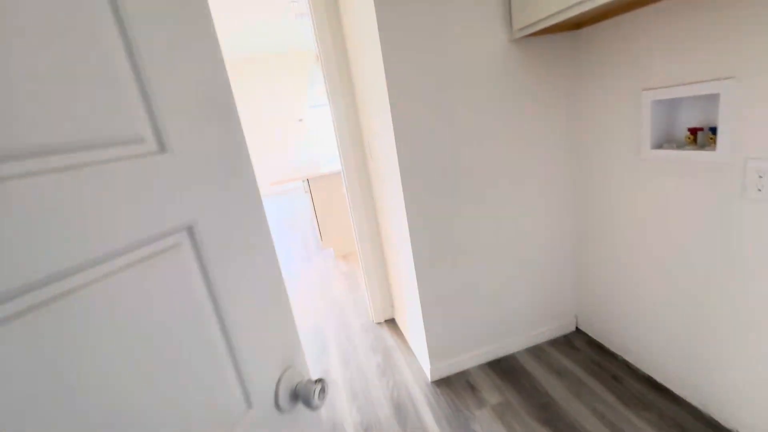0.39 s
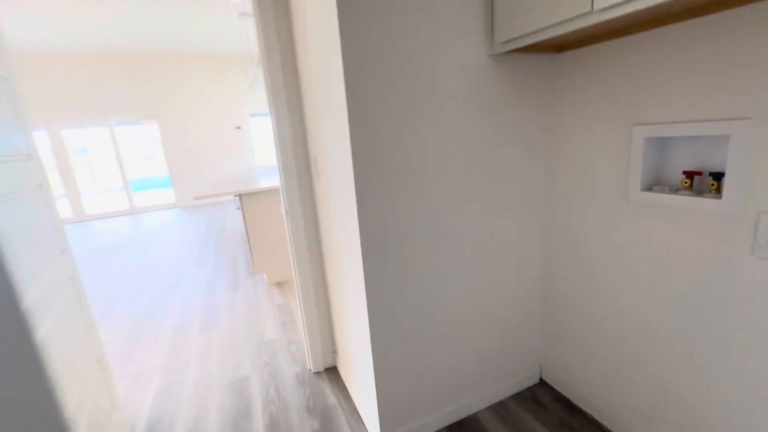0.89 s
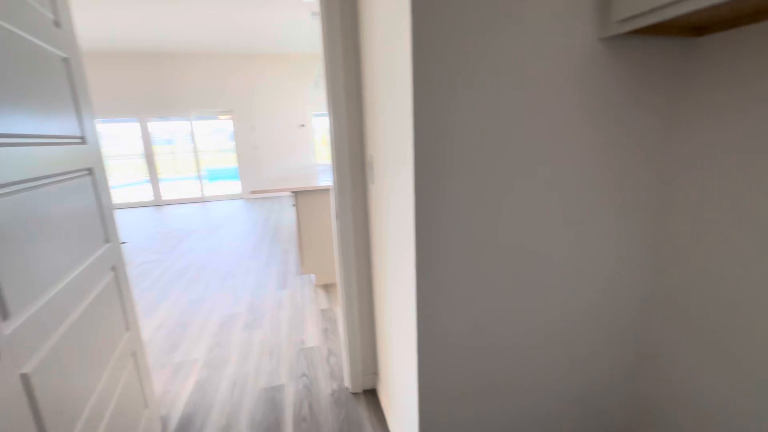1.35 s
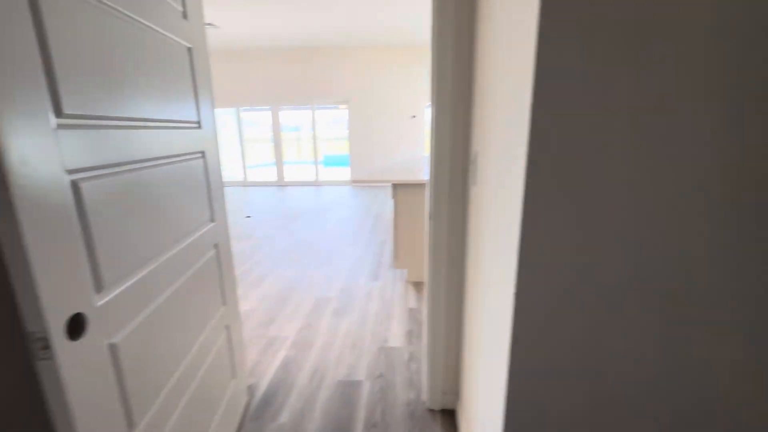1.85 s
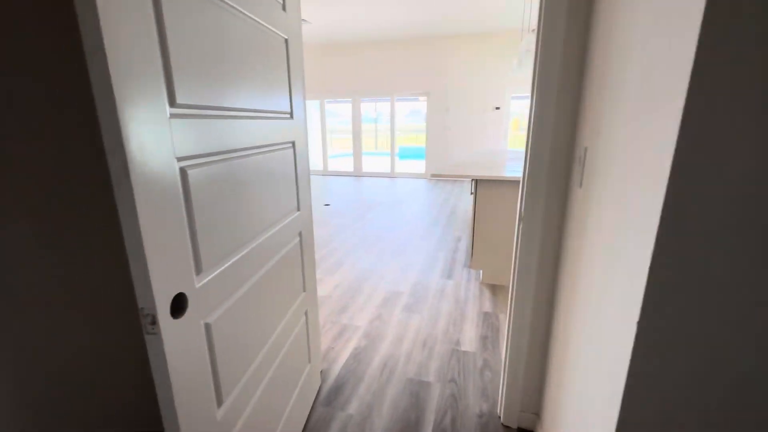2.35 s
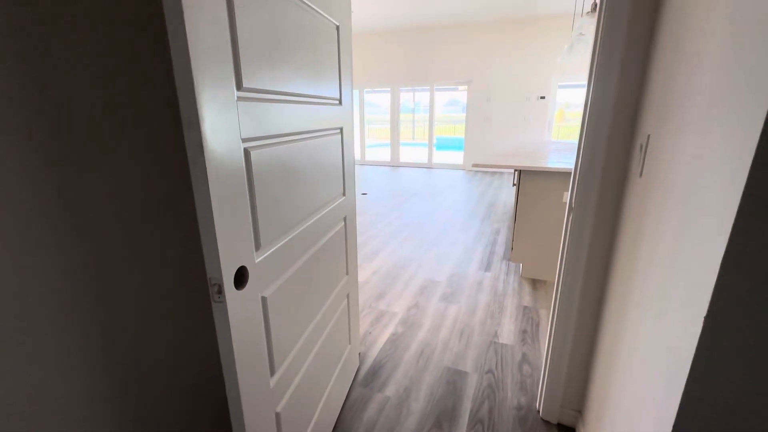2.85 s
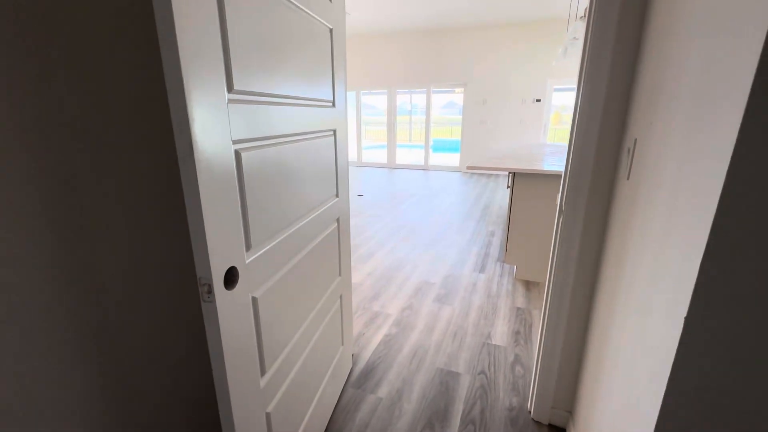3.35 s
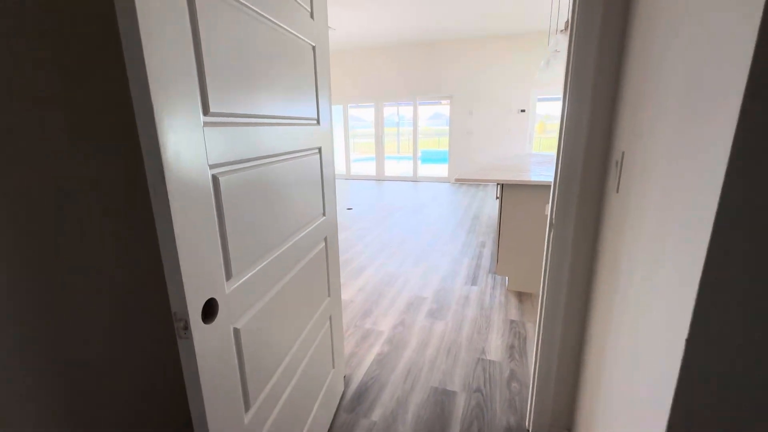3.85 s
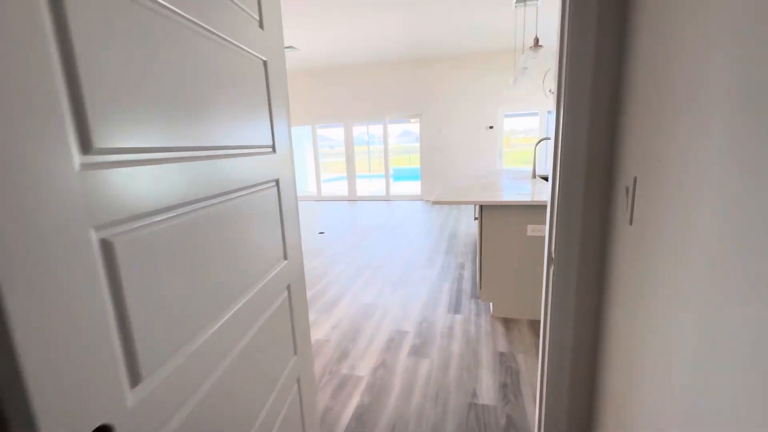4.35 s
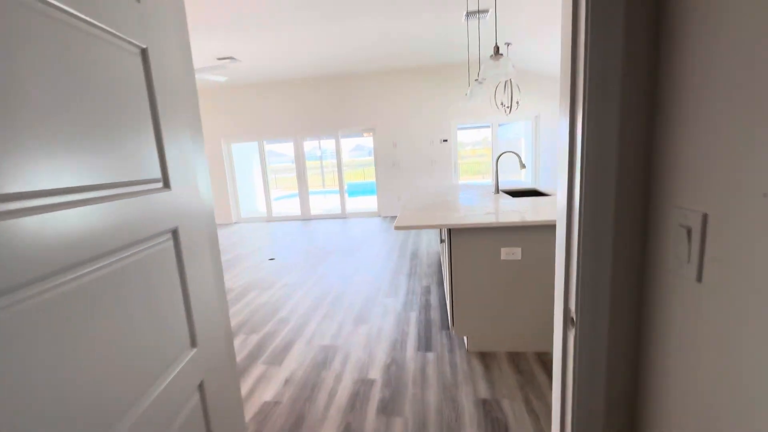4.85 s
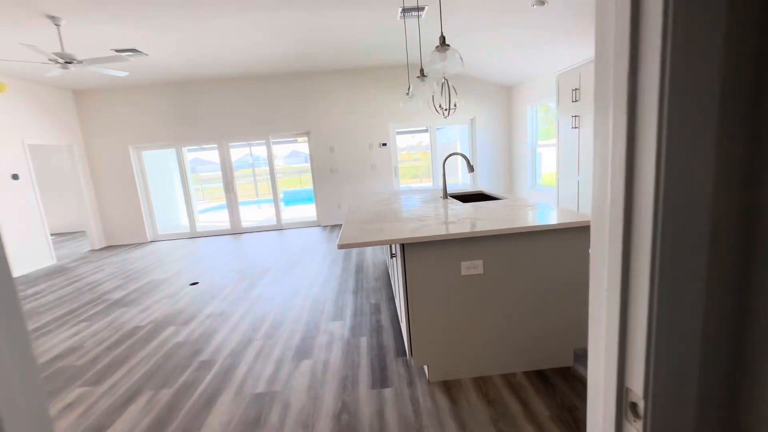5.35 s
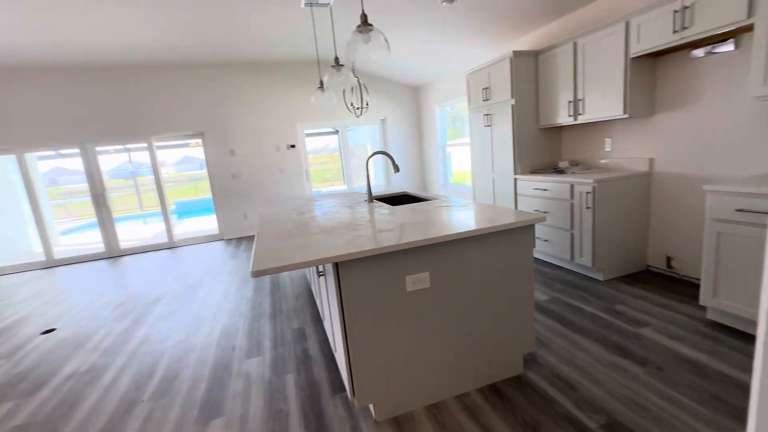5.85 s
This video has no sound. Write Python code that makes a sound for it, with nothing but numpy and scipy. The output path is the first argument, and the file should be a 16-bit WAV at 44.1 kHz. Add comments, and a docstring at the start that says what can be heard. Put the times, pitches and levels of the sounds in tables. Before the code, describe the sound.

Inside an empty, hard-floored house with a faint motor hum and low rumble, a soft low roll fades while small ticks, rustles and light shoe slaps sound. A hinge squeaks faintly, a sole scrapes sharply, then a door knocks twice and thuds heavily, shuddering briefly. A long echo fades as scuffing steps resume. Stereo microphones are carried close, most details leaning left.

```python
"""A faint appliance hum, a rumble and constant noise last throughout; a low roll opens, made of filtered noise.
Soles slap (squeezed air), scuff and rustle (shaped noise), small things tick (short rings), a hinge squeaks
(narrow gliding noise) and a sole scrapes. A door is then knocked twice, thuds (low resonances) and shudders on.
Walking resumes. Bare rooms answer with a long echo of fading noise.
Two spaced microphones hear it; the left one is nearer to most sounds."""
import sys
import numpy as np
from scipy import signal
from scipy.fft import rfft, irfft, next_fast_len
from scipy.io import wavfile
from scipy.ndimage import uniform_filter1d, map_coordinates

SR = 44100
rng = np.random.default_rng(int(sys.argv[2]) if len(sys.argv) > 2 else 0)


def materialize(psi):
    """Save the field psi as 16-bit PCM at rate SR to the path in sys.argv[1].

    A 1-D psi becomes a single channel; in a 2-D psi each row is a channel.
    """
    bounded = np.clip(np.atleast_2d(psi).T, -1, 1)
    quanta = np.round(bounded * 32767).astype(np.int16)
    wavfile.write(sys.argv[1], SR, quanta)


def decibels_to_gain(level_db):
    """Convert a level in decibels to a linear amplitude gain (20 dB per decade)."""
    exponent = np.asarray(level_db, float) / 20
    return 10 ** exponent


N = 273861  # length [samples]

# Rumble of the building over time: (time [s], level [dB])
RUMBLE_LEVEL = [(0.0, -55.5), (1.3, -57.5), (1.9, -54), (2.46, -62), (2.85, -55.5), (3.2, -61), (5.0, -63),
                (6.21, -63.5)]
# Colour of that rumble: (frequency [Hz], relative level per hertz [dB])
RUMBLE_COLOUR = [(15, -43), (30, -1), (45, -4), (70, 4.5), (105, -7.5), (150, -11), (240, -5.5),
                 (350, -8.5), (570, -91)]
# Colour of the faint constant noise: (frequency [Hz], relative level per hertz [dB])
NOISE_COLOUR = [(120, -81), (200, -49), (282, 5.5), (338, -16.5), (412, -3.5), (696, -12.5), (929, -9.5),
                (3870, -19), (8260, -36.5), (15000, -64)]
# Motor over time: (time [s], turns per second [Hz], change of wavering tones [dB], change of steady tone [dB])
MOTOR = [(0, 70.05, 5, -2.5), (.5, 71.26, -1, -1.5), (1.5, 71.05, -4, -2), (3.3, 70.57, -12, 0),
         (5, 71.74, -7, -10), (6.21, 70.6, -8.5, -3)]
# Wavering motor tones: (multiple of the motor's frequency [-], level before that change [dB])
WAVERING_TONES = [(1, -76), (2, -65.5), (3, -93), (5, -75)]
# Steady motor tone: (multiple of the motor's frequency [-], level before that change [dB])
STEADY_TONE = (4, -61)
# Colour of the opening roll: (frequency [Hz], relative level per hertz [dB])
ROLL_COLOUR = [(40, -37), (70, 5), (100, -3), (150, 1.5), (200, -9.5), (280, -43)]
# Noise under the separate events: sole drag, at 4.2 s mostly the door's dying echo; rustle of cloth and grit
# (time [s], drag or echo [dB], rustle [dB])
MOVING = [(0.0, -55.5, -55.5), (0.4, -55, -60.5), (0.8, -55.5, -57), (0.98, -54, -65.5), (1.25, -60, -63.5),
          (1.6, -54.5, -59), (2.3, -55, -82), (2.6, -60.5, -81), (2.8, -60, -56.5), (3.0, -58, -85),
          (3.38, -74, -82), (4.2, -49, -59.5), (4.5, -57, -57.5), (4.86, -59.5, -65.5), (5.1, -55, -54),
          (5.27, -85.5, -71.5), (5.5, -50.5, -58), (6.1, -65, -72.5)]
# Colour of dragging soles: (frequency [Hz], relative level per hertz [dB])
DRAG_COLOUR = [(250, -19.5), (450, -6), (800, -2), (1200, 0), (1700, -3), (2600, -16), (4000, -38)]
# Colour of rustle and grit: (frequency [Hz], relative level per hertz [dB])
GRIT_COLOUR = [(1500, -5.5), (2400, -1), (3300, 1.5), (4300, -0.5), (5200, 2), (6000, 1.5), (7200, -3.5),
               (8300, -4), (10000, -9), (16000, -11.5)]
# Bright ticks: (time [s], level [dB], ring [Hz], left over right [dB])
TICKS = [(0.0337, -36.5, 3640, 10), (0.2537, -37.5, 3900, 6.5), (0.293, -43, 5760, 1),
         (0.432, -33, 4050, 7), (0.4442, -28.5, 6800, 11.5), (0.4448, -28, 2060, -2),
         (0.744, -45, 6100, 1.5), (0.8864, -32, 4120, 0.5), (1.197, -37, 4380, 17), (1.4695, -33, 4050, 7),
         (1.7737, -47.5, 8420, -29), (2.8405, -42, 4100, -1), (2.8533, -24, 3600, 6),
         (2.86, -22.5, 3770, -12)]
# Soles landing and sliding: (time [s], drag [dB], grit [dB])
SCUFFS = [(.783, -57.5, -57.5), (0.87, -59.5, -56), (1.199, -63.5, -61.5), (1.396, -53.5, -52.5),
          (2.759, -80, -61), (2.878, -40, -39), (4.089, -57, -57), (4.259, -64, -62), (4.454, -51.5, -49.5),
          (4.574, -66, -53), (4.806, -54, -54.5), (5.024, -51, -46), (5.417, -54.5, -62), (5.664, -50, -51),
          (6.044, -54.5, -54)]
# Blows of the door: (time [s], level [dB], boom over it [dB], edge over it [dB], 60 dB fade of the rattle [s])
BLOWS = [(3.409, -35, -13, 1, 0.21), (3.416, -27, -3, 3.5, 0.05), (3.439, -31.5, 8, -2, 0.34),
         (3.547, -8.5, -8.5, -21, 0.039), (3.551, -13, -12, -25, 0.039), (3.562, -19, 7, -29, 0.045),
         (3.584, -17.5, -4, -37, 0.18)]
# The door shudders on against its stop: (time [s])
REBOUND_TIMES = [3.604, 3.684, 3.719, 3.839, 3.949]
# Low resonances of door and floor: (frequency [Hz], width [Hz], relative level [dB])
DOOR_MODES = [(30.2, 20, -2.5), (48.4, 15, -2), (65, 2.64, 8), (70.9, 27.7, 1), (97, 41, -1),
              (142.5, 26, 1), (229, 34.4, -4), (289.3, 22, -4), (391, 113, -9)]
# Resonances of the rattling panel: (frequency [Hz], width [Hz], relative level [dB])
PANEL_MODES = [(636, 384, 1.5), (1000, 756, 3.5), (1700, 640, 2.5), (2490, 1860, -11.5)]
# Sole slaps: (time [s], level [dB], pitch of the air pocket [Hz], snap over slap [dB], near walls' answer [dB])
STEPS = [(0.53, -31.5, 740, -10, 4.5), (0.606, -36, 710, -0.5, 3.5), (1.453, -43, 1130, 1, 9),
         (1.469, -28, 1100, -5, -2.5), (1.571, -25.5, 1070, 4.5, 4.5), (1.919, -19, 894, -7, 4),
         (2.878, -31, 1000, 5.5, 1.5), (4.799, -35.5, 867, -24, 4.5), (4.875, -32, 1100, 9, 4),
         (5.517, -26.5, 1610, -6, 0), (6.043, -38.5, 716, -27, 2.5), (6.085, -35, 970, -3, 0)]
# Likeness of room sound at both microphones: (frequency [Hz], left-right likeness [-])
LIKENESS = [(25, 0.98), (60, 0.9), (180, 0.78), (450, 0.34), (1000, 0.24), (2400, 0.08), (6000, 0.07),
            (10000, 0.45), (13000, 0.6)]
# Fading of the near walls' answer: (frequency [Hz], time to fall 60 dB [s])
NEAR_FADE = [(60, 0.12), (500, 0.36), (2000, 0.22), (10000, 0.098)]
# Fading of the whole house's answer: (frequency [Hz], time to fall 60 dB [s])
HOUSE_FADE = [(60, 1.3), (170, 0.53), (400, 1.19), (800, 1.73), (1500, 2.25), (4000, 1.41), (10000, 0.99)]
# Colour of the microphones: (frequency [Hz], gain [dB])
MICROPHONE = [(20, -9), (40, 2), (10100, 0), (10700, -14), (11500, -30), (12400, -9), (13300, -4.5),
              (15300, -4), (16000, -69)]

FIELD_LAG_S = 0.00045  # room sound reaches the right microphone later
LAG_S_PER_DB = 0.00004  # a source to one side is louder and earlier in that microphone
PATCHY_DB = 1.5  # unevenness of rumble, constant noise and roll
NOISE_DB = -63
ROLL_DB, ROLL_END_S, ROLL_FADE_DB_PER_S = -52.5, 0.48, 27  # level, held until, then fading
SCRAPE_S, SCRAPE_DRAG_DB, SCRAPE_GRIT_DB = 1.921, -28, -31  # one long scrape, at its peak
RUB_START_S, RUB_DB = 1.797, -38.5  # the sole rubs at once, evenly, until the peak
SWELL_DB_PER_S, STOP_DB_PER_S = 207, 303  # the scrape swells, then stops short
LINGER_DB, LINGER_DB_PER_S = -8, 61  # and lingers in the rooms
SQUEAK_S, SQUEAK_HZ, GLIDE_HZ_PER_S = 1.16, 1590, 780  # middle of the squeak, its pitch there, rise
SQUEAK_FALL_S, SQUEAK_DB, THIRD_DB = 0.18, -59.5, -14  # fall by a factor e, peak, third partial under it
SLIDE_T60_S, SCUFF_PAN_DB = 0.3, 6  # time to fall 60 dB; left over right
REBOUND_DB, REBOUND_LOSS_DB_PER_S = -22, 47.5  # first rebound, weakening of later ones
REBOUND_BOOM_DB, REBOUND_EDGE_DB, REBOUND_T60_S = 7.5, -32, 0.052
BOOM_SOFT_HZ = 900  # the heavy leaf lands softly
STEP_PAN_DB, STEP_HOUSE_DB = 1.5, -7  # left over right; the house relative to the near walls
WALL_S, WALL_DB, WALL_PAN_DB = 0.0072, -3, -3  # a close wall on the right repeats each slap


def unit(x):
    """Bring to an average strength (rms) of 1."""
    return x / np.sqrt(np.mean(x ** 2) + 1e-20)


def along(points, hz):
    """Read a (frequency, value) table on a logarithmic frequency axis."""
    frequency, value = np.transpose(points)
    return np.interp(np.log(hz + 1), np.log(frequency + 1), value)


def curves(rows):
    """Give one value per sample for each column after the time."""
    time, *columns = np.transpose(rows)
    return [np.interp(np.arange(N) / SR, time, column) for column in columns]


def wobble(rate):
    """Draw a smooth random curve through 'rate' random points a second."""
    points = rng.standard_normal(int(N * rate / SR) + 4)
    return map_coordinates(points, [np.arange(N) * rate / SR])


def filtered(x, response):
    """Multiply the spectrum of x by a response that depends on frequency."""
    n = x.shape[-1]
    size = next_fast_len(n + 8192)
    spectrum = rfft(x, size) * response(np.fft.rfftfreq(size, 1 / SR))
    return irfft(spectrum, size)[..., :n]


def modes(table):
    """Add resonances of alternating sign that ring only after the push."""
    def response(f):
        total = 0
        for k, (centre, width, db) in enumerate(table):
            damping = 1j * f * width
            total = total + (-1) ** k * decibels_to_gain(db) * damping / (centre ** 2 - f ** 2 + damping)
        return total
    return response


def bright(f):
    """Broad treble resonances for the click of an edge."""
    return modes([(3600, 2500, 0), (6000, 3000, -3), (9000, 4000, -10)])(f)


def diffuse(pair, colour):
    """Colour two noises, mix them to the likeness of the room's field and delay the right side."""
    def mixing(hz):
        angle = np.arccos(np.clip(along(LIKENESS, hz), -1, 1)) / 2
        return decibels_to_gain(along(colour, hz)) * [np.cos(angle), np.sin(angle)]
    mid, side = filtered(pair, mixing)
    return np.array([mid + side, np.roll(mid - side, round(FIELD_LAG_S * SR))])


def rush(colour, patchy_db, grain_db):
    """Diffuse noise of rms 1, patchy in time and pitch, made of uneven grains."""
    grains = rng.standard_normal((2, N)) * decibels_to_gain(grain_db * wobble(300))
    z = signal.stft(grains, nperseg=512)[2]
    patches = rng.standard_normal(z.shape[1:])
    patches = uniform_filter1d(patches, size=8, axis=0)  # across pitch
    patches = uniform_filter1d(patches, size=12, axis=1)  # across time
    pair = signal.istft(z * decibels_to_gain(patchy_db * unit(patches)), nperseg=512)[1][:, :N]
    return unit(diffuse(pair, colour))


def contact(t60, rattle, colour, size=SR // 4):
    """A sharp contact and a dying noisy rattle, coloured by resonances, of peak 1."""
    fade = decibels_to_gain(-60 * np.arange(size) / SR / t60)
    push = rattle * rng.standard_normal(size) * fade
    push[0] += 1
    sound = filtered(push, colour)
    return sound / np.abs(sound).max()


def tail(fade_times, size):
    """A stereo room answer, of energy 1 on the left, in which each frequency dies at its own speed."""
    noise = diffuse(rng.standard_normal((2, size)), [(100, 0)])
    hz, t, z = signal.stft(noise, SR, nperseg=512)
    fade = decibels_to_gain(-60 * t / along(fade_times, hz)[:, None])
    answer = signal.istft(z * fade, SR, nperseg=512)[1]
    return answer / np.linalg.norm(answer[0])


def add(out, s, sound, pan_db, near_db, house_db):
    """Place a sound: direct, then the near walls, then the whole house building up."""
    at, size = round(s * SR), 5 * SR // 4
    build_up = 1 - np.exp(-np.arange(size) / (0.032 * SR))
    answer = tail(HOUSE_FADE, size)[:, :size] * build_up * decibels_to_gain(house_db)
    near, gap = tail(NEAR_FADE, SR // 3), round(0.0025 * SR)
    answer[:, gap:gap + near.shape[1]] += near * decibels_to_gain(near_db)
    wet = signal.fftconvolve(sound[None], answer, axes=1)
    out[:, at:at + wet.shape[1]] += wet[:, :out.shape[1] - at]
    half_lag = round(LAG_S_PER_DB * pan_db * SR / 2)
    for ear, side in zip(out, (1, -1)):  # left, right
        part = ear[at - side * half_lag:][:len(sound)]
        part += (sound * decibels_to_gain(side * pan_db / 2))[:len(part)]


def house():
    """Rumble of the building, a motor's tones at multiples of its turning rate and faint constant noise."""
    rumble_level = decibels_to_gain(curves(RUMBLE_LEVEL)[0] + 0.76 * wobble(5.1))
    rumble = rumble_level * rush(RUMBLE_COLOUR, PATCHY_DB, grain_db=0.2)
    hz, wavering_db, steady_db = curves(MOTOR)
    # the right microphone hears the motor slightly shifted in phase
    turn = 2 * np.pi * np.cumsum(hz + 0.14 * wobble(2.865)) / SR + np.array([[0], [0.12]])
    wavering = 0
    for multiple, db in WAVERING_TONES:
        level = decibels_to_gain(db + wavering_db + 4.9 * wobble(13))
        wavering = wavering + level * np.sin(multiple * turn + 0.98 * wobble(8.5))
    multiple, db = STEADY_TONE
    steady = decibels_to_gain(db + steady_db + 0.4 * wobble(2.6)) * np.sin(round(multiple) * turn)
    noise = decibels_to_gain(NOISE_DB) * rush(NOISE_COLOUR, PATCHY_DB, grain_db=1.6)
    return rumble + np.sqrt(2) * (wavering + steady) + noise


def roll():
    """A lumpy low roll of noise at the start dies away."""
    t = np.arange(N) / SR
    level_db = ROLL_DB - ROLL_FADE_DB_PER_S * np.maximum(t - ROLL_END_S, 0) + wobble(8.6)
    return decibels_to_gain(level_db) * rush(ROLL_COLOUR, PATCHY_DB, grain_db=0.5)


def movement():
    """Noise under the events: sole drag (at 4.2 s mostly the door's dying echo), rustle and one scrape."""
    drag_db, rustle_db = curves(MOVING)
    t = np.arange(N) / SR - SCRAPE_S
    swell = decibels_to_gain(-SWELL_DB_PER_S * abs(t))
    after = decibels_to_gain(-STOP_DB_PER_S * abs(t)) + decibels_to_gain(LINGER_DB - LINGER_DB_PER_S * abs(t))
    scrape = np.where(t < 0, swell, after / after.max())
    rub = decibels_to_gain(RUB_DB) * (t < 0) * (t > RUB_START_S - SCRAPE_S)
    drag_level = decibels_to_gain(drag_db) + rub + decibels_to_gain(SCRAPE_DRAG_DB) * scrape * (t >= 0)
    rustle_level = decibels_to_gain(rustle_db) + decibels_to_gain(SCRAPE_GRIT_DB) * scrape
    drag = drag_level * rush(DRAG_COLOUR, patchy_db=2.5, grain_db=1.0)
    return drag + rustle_level * rush(GRIT_COLOUR, patchy_db=2.65, grain_db=1.0)


def hinge():
    """A hinge's faint breathy squeak: narrow bands of friction noise that glide up."""
    t = np.arange(N) / SR - SQUEAK_S
    # slow noise makes each tone a narrow band
    band = unit(filtered(rng.standard_normal((2, N)), lambda f: 1 / (1 + (f / 130) ** 2)))
    turn = 2 * np.pi * (SQUEAK_HZ * t + GLIDE_HZ_PER_S * t ** 2 / 2)
    tones = np.sin(turn) + decibels_to_gain(THIRD_DB) * np.sin(3 * turn)
    swing = decibels_to_gain(SQUEAK_DB) * np.exp(-(t / SQUEAK_FALL_S) ** 4)
    return np.sqrt(2) * band * swing * tones


def ticks():
    """Tiny hard contacts, each with one short ring and a little treble."""
    out = np.zeros((2, N))
    for s, db, hz, pan_db in TICKS:
        tick = contact(0.0011, 0.03, modes([(hz, 900, 0), (9000, 6000, -14)]))
        add(out, s, decibels_to_gain(db) * tick, pan_db, near_db=1.5, house_db=-7)
    return out


def scuffs():
    """A landing sole's friction noise starts at once and fades as it slides to rest."""
    out, t = np.zeros((2, N)), np.arange(SR // 2) / SR
    stroke = decibels_to_gain(-60 * t / SLIDE_T60_S) * (1 - np.exp(-t / 0.00023))

    def friction(colour):
        return unit(filtered(rng.standard_normal(len(t)), lambda hz: decibels_to_gain(along(colour, hz))))

    for s, drag_db, grit_db in SCUFFS:
        rub = decibels_to_gain(drag_db) * friction(DRAG_COLOUR) + decibels_to_gain(grit_db) * friction(GRIT_COLOUR)
        add(out, s, stroke * rub, SCUFF_PAN_DB, near_db=0.5, house_db=-9.5)
    return out


def door():
    """Each blow pushes the low modes of panel and floor, rattles the panel and clicks at its edge."""
    out = np.zeros((2, N))
    rebounds = []
    for s in REBOUND_TIMES:
        db = REBOUND_DB - REBOUND_LOSS_DB_PER_S * (s - REBOUND_TIMES[0])
        rebounds.append((s, db, REBOUND_BOOM_DB, REBOUND_EDGE_DB, REBOUND_T60_S))
    soft_boom = lambda f: modes(DOOR_MODES)(f) / (1 + 1j * f / BOOM_SOFT_HZ) ** 2
    soft_panel = lambda f: modes(PANEL_MODES)(f) / (1 + 1j * f / 2500)
    for s, db, boom_db, edge_db, t60 in list(BLOWS) + rebounds:
        boom = contact(0.057, 0.0092, soft_boom, size=SR)
        rattle = contact(t60, 1.0, soft_panel, size=SR // 3)
        edge = contact(t60, 1.4, bright, size=SR // 3)
        add(out, s, decibels_to_gain(db + boom_db) * boom, 0, near_db=-1, house_db=0)
        add(out, s, decibels_to_gain(db) * (rattle + decibels_to_gain(edge_db) * edge), 1.2, near_db=4.0, house_db=-0.5)
    return out


def steps():
    """Each slap is a millisecond squeeze of the air under the sole, doubled by the floor, with a crisp snap."""
    out = np.zeros((2, N))
    crisp = modes([(2110, 2700, -2.5), (3680, 4600, -4.0), (7200, 5200, -13.5)])
    for s, db, hz, snap_db, room_db in STEPS:
        pocket = modes([(400, 300, -9), (hz, 550, 0), (1.164 * hz, 900, -7)])

        def soft(f):
            floor_echo = 1 + 0.5 * np.exp(-2j * np.pi * f * 0.00097)  # 0.97 ms later
            return pocket(f) / (1 + 1j * f / 3500) * floor_echo

        slap = contact(0.00092, 0.037, soft, size=SR // 20)
        snap = contact(0.00033, 0.21, crisp, size=SR // 20)
        sound = decibels_to_gain(db) * (slap + decibels_to_gain(snap_db) * snap)
        add(out, s, sound, STEP_PAN_DB, near_db=room_db, house_db=room_db + STEP_HOUSE_DB)
        for ear, side in zip(out, (1, -1)):  # left, right
            wall_level = decibels_to_gain(db + WALL_DB + side * WALL_PAN_DB / 2)
            ear[round((s + WALL_S) * SR):][:len(slap)] += wall_level * slap
    return out


def scene():
    """All sources together, from the background to the steps."""
    background = house() + roll() + movement()
    return background + hinge() + ticks() + scuffs() + door() + steps()


def top_cut(x):
    """Nothing passes above the cut-off."""
    return signal.sosfilt(signal.butter(12, 16190, fs=SR, output="sos"), x)


def record(dry):
    """The microphones colour the sound, with a deep dip in the top octave."""
    heard = filtered(dry, lambda hz: decibels_to_gain(along(MICROPHONE, hz)))
    return top_cut(heard)


dry = scene()
out = record(dry)
materialize(out)
```